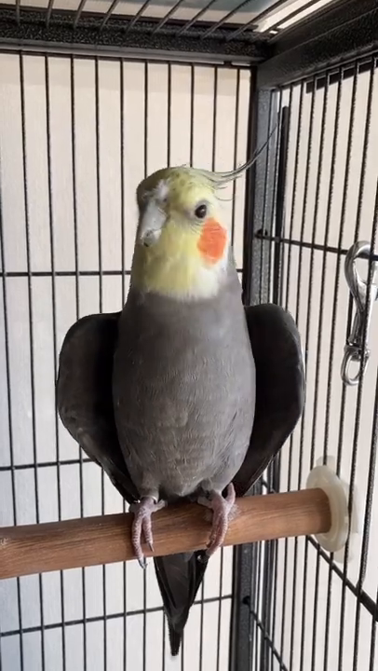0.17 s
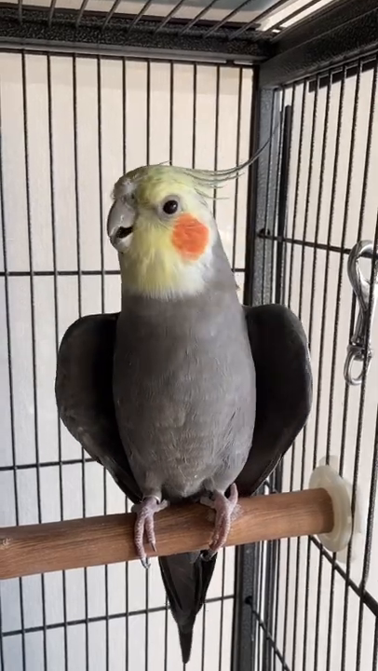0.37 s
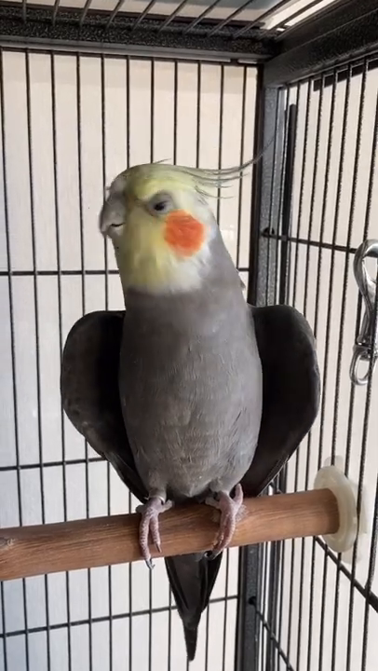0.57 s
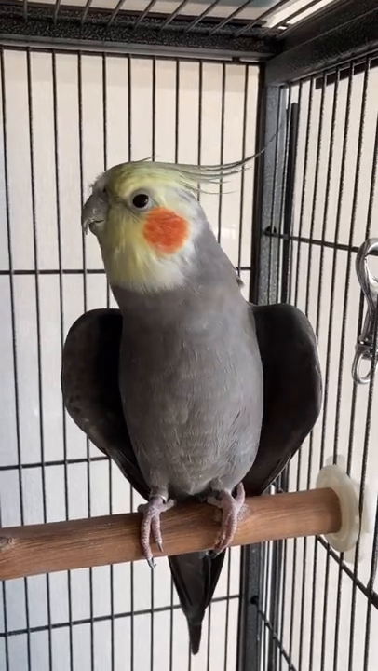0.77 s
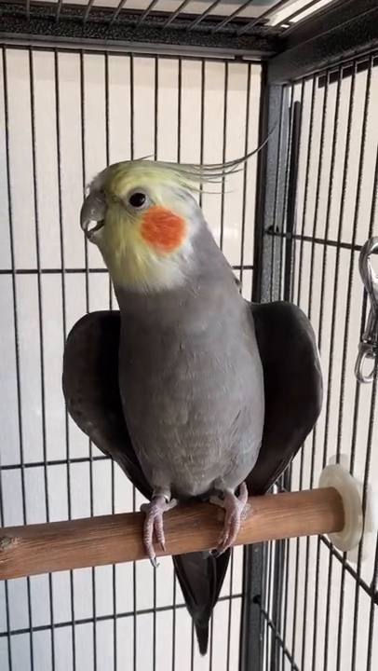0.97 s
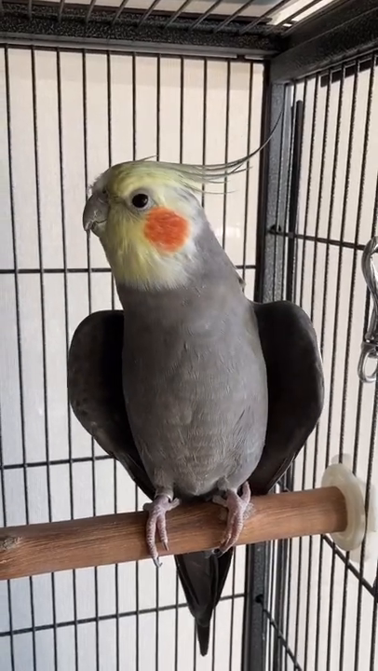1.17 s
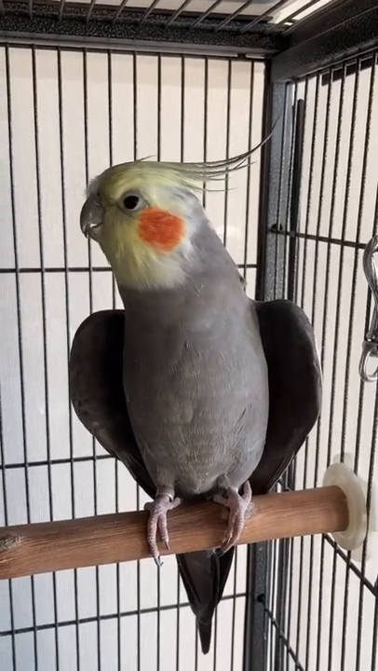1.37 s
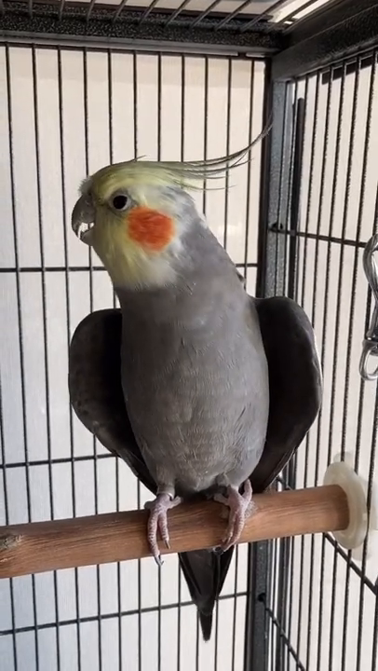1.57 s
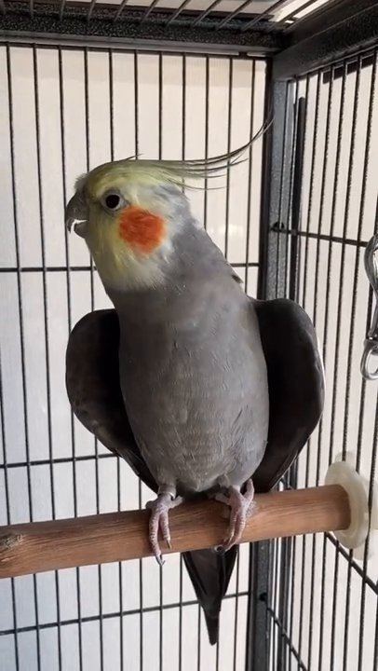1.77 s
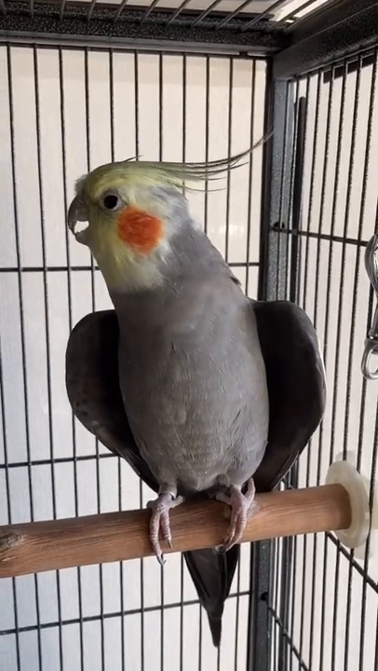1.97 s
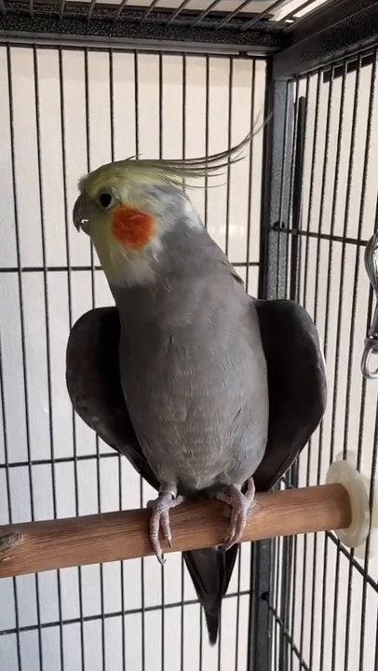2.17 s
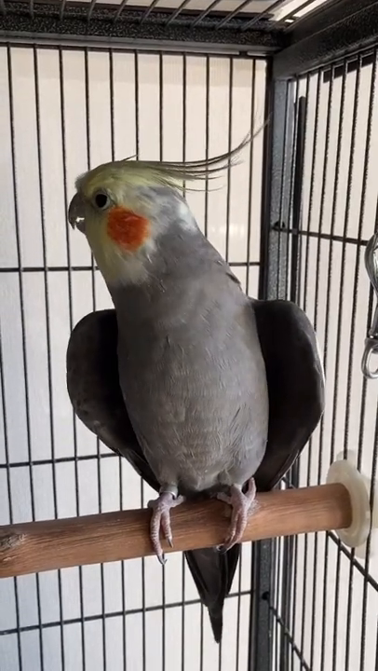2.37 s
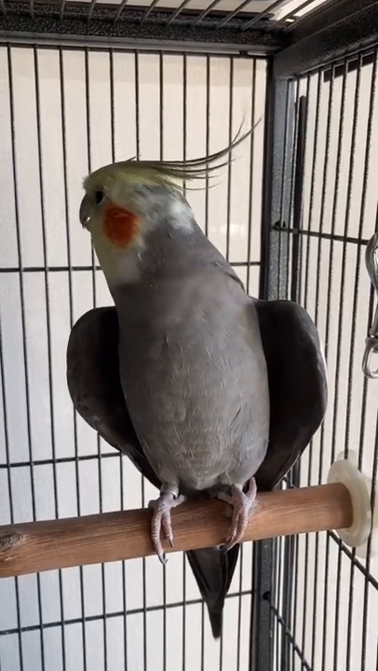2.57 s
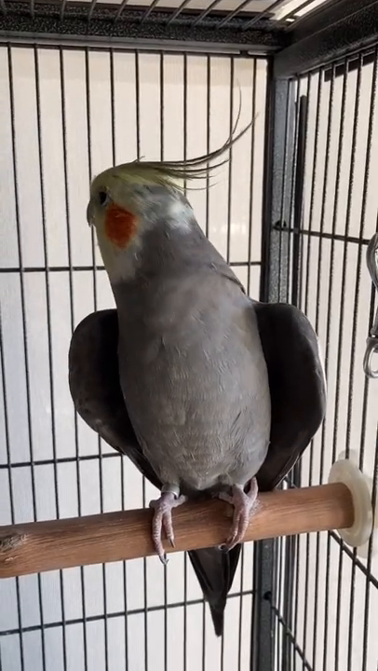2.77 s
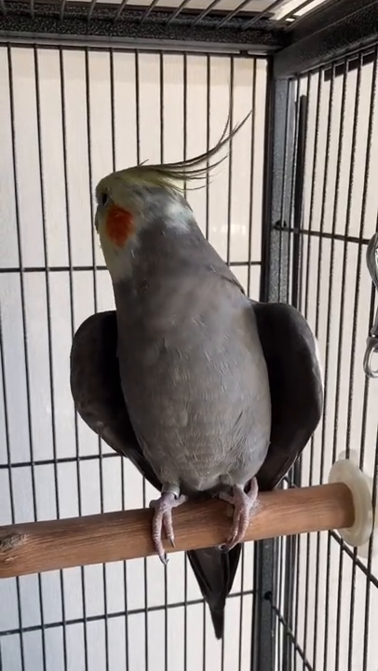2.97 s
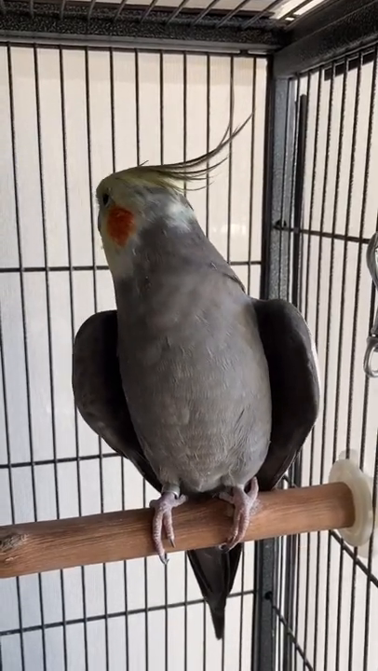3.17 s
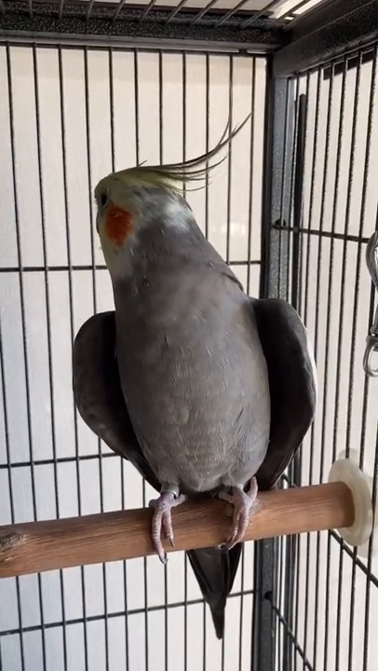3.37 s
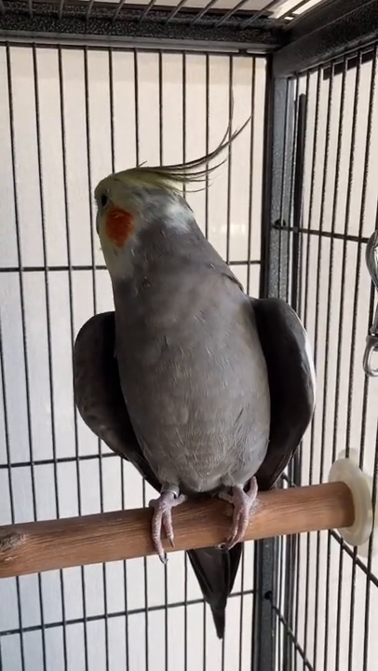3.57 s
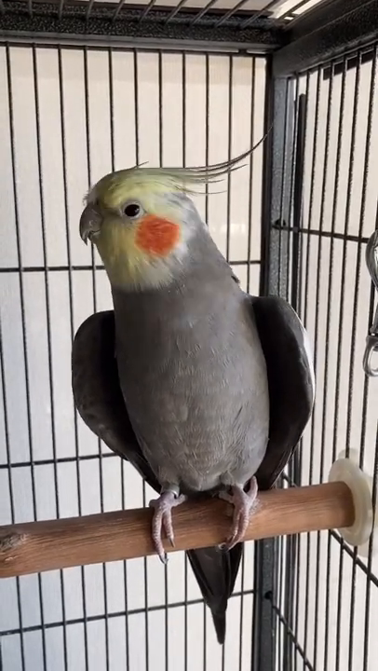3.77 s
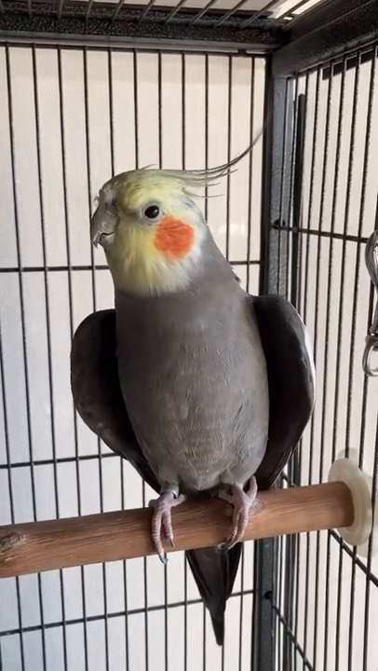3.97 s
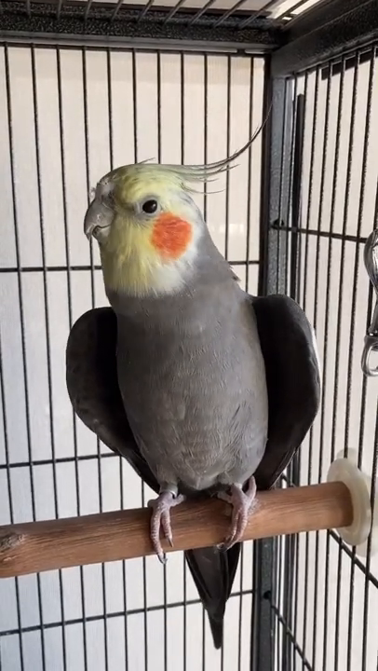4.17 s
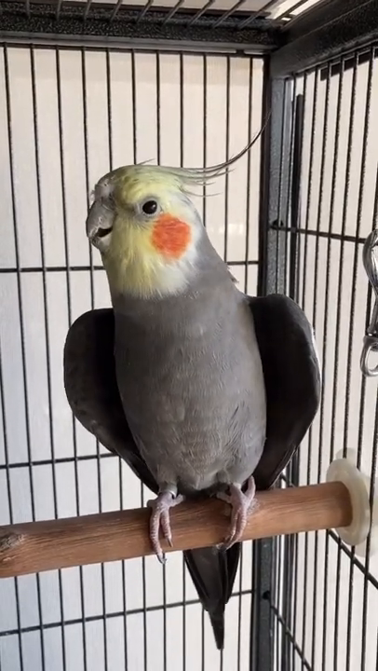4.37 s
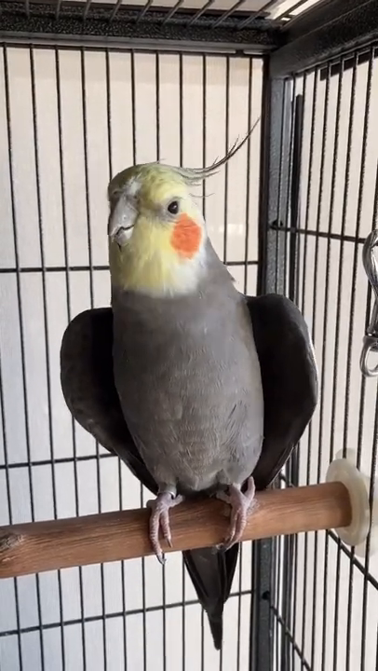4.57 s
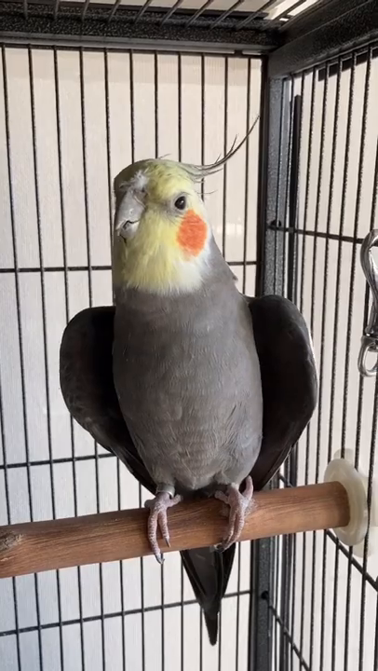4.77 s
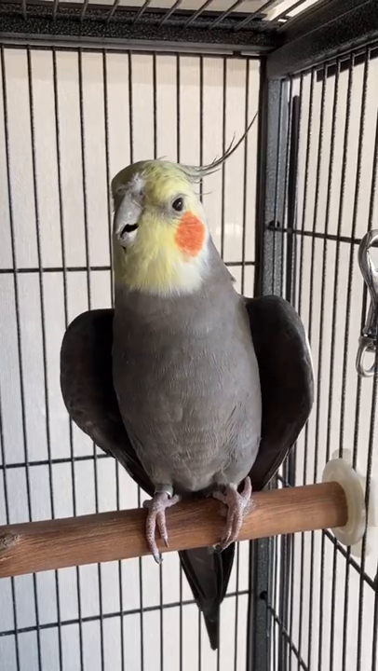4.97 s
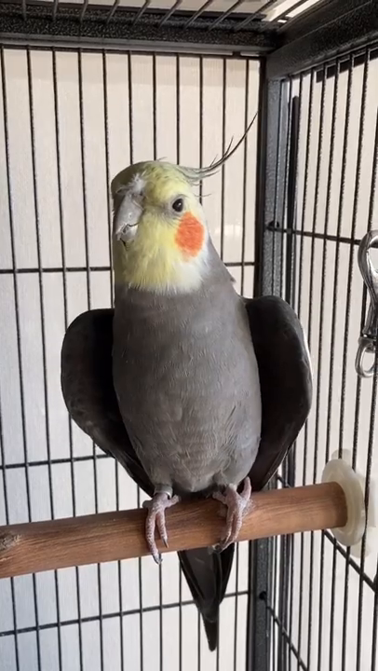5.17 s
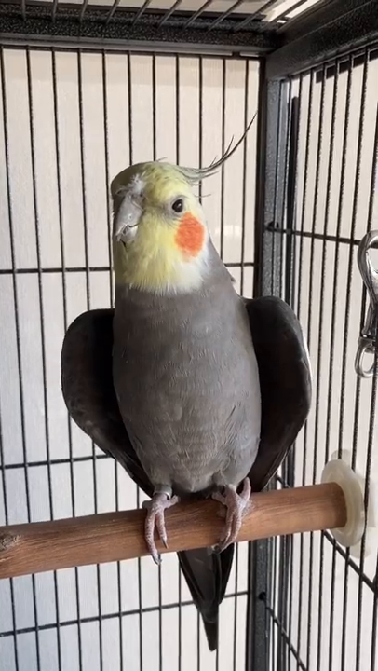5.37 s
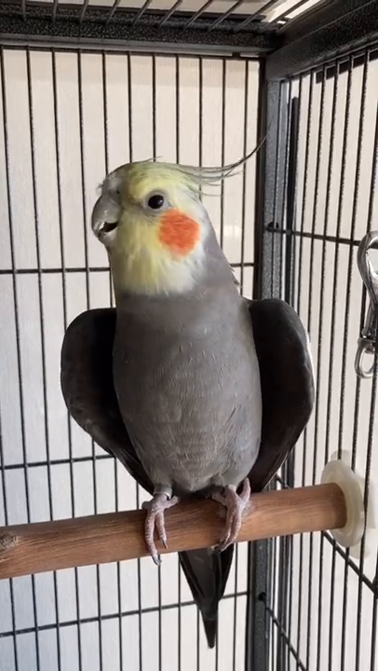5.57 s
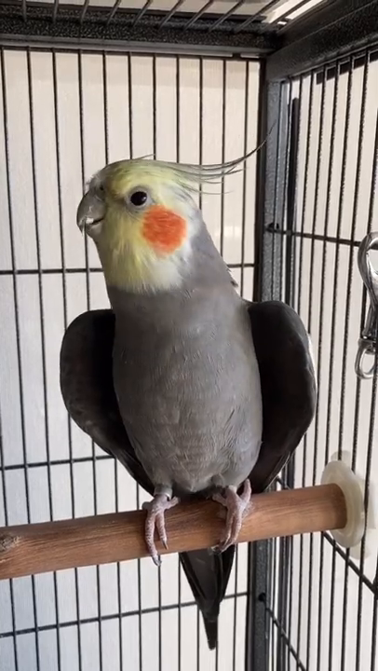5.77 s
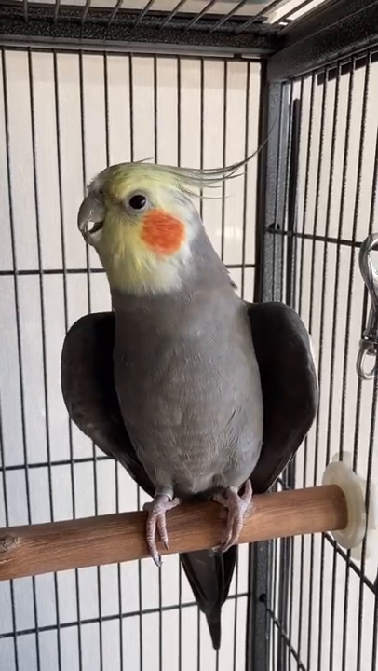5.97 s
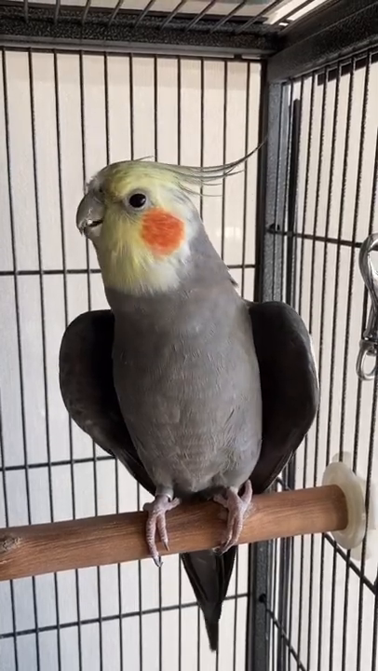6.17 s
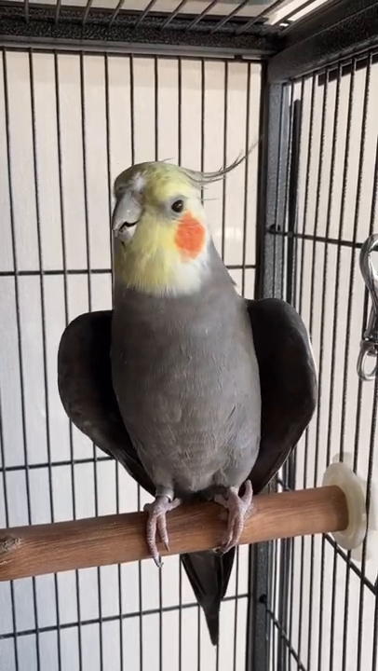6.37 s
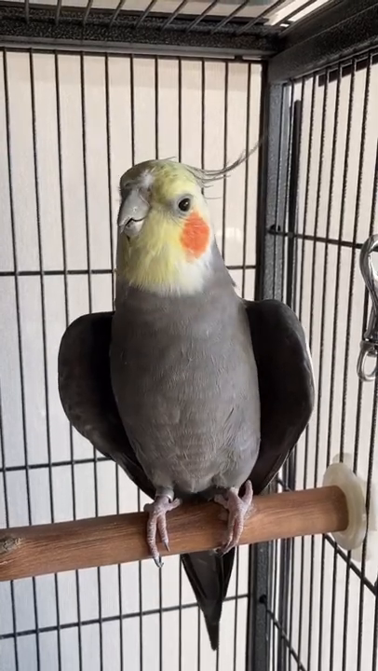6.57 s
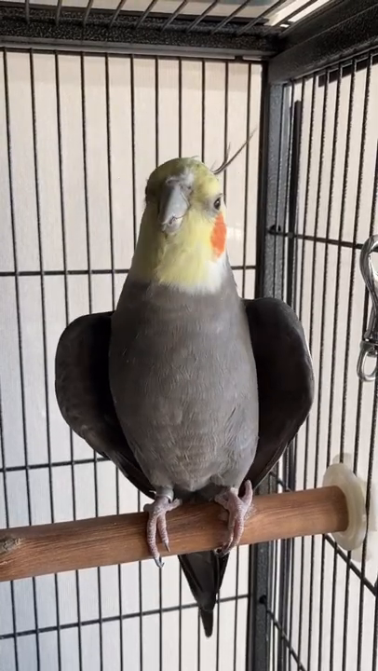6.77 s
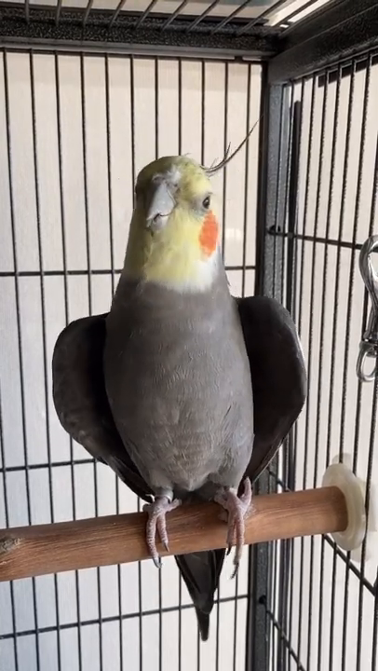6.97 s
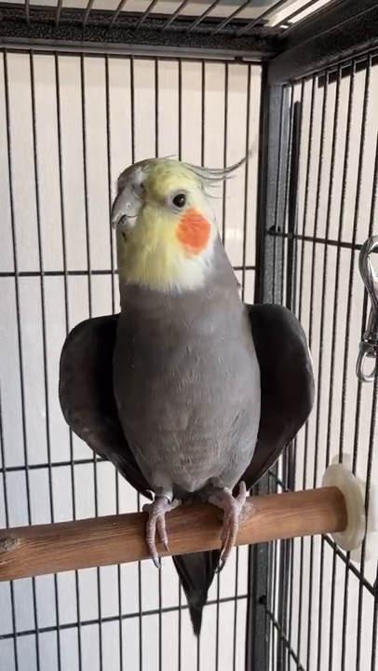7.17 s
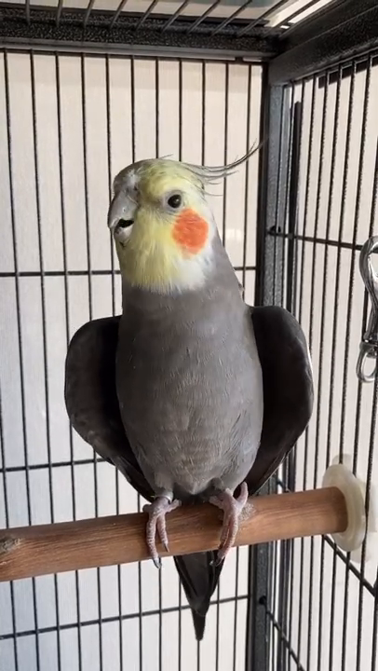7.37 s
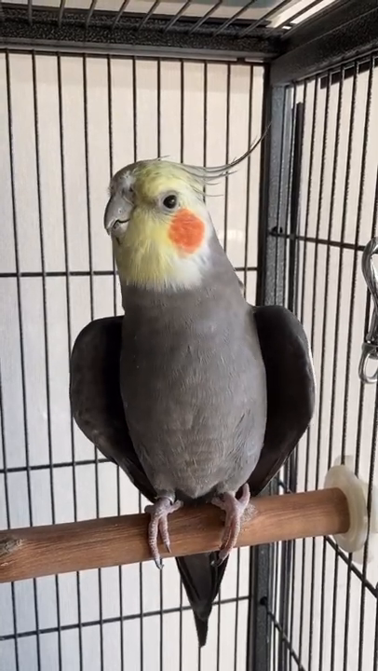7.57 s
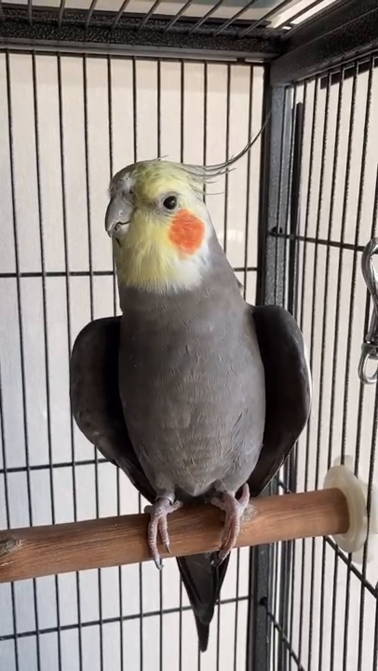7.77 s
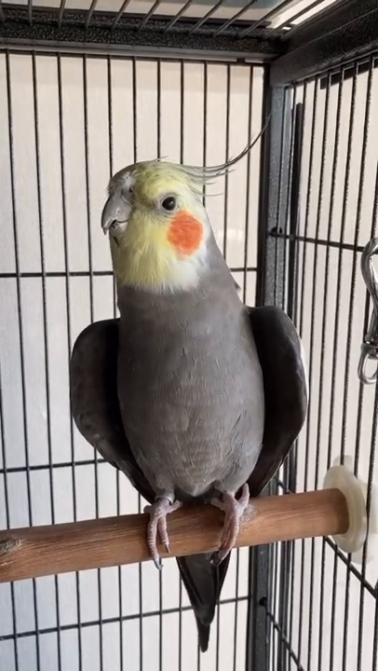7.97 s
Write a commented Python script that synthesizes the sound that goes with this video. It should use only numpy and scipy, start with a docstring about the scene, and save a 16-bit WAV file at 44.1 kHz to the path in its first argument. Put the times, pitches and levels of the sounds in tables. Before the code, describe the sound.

A cockatiel sings close to the microphone in a quiet room. From the start it whistles short, high notes that glide up and down, many opening with a brief rasp. Between about 0.6 and 1.4 seconds a second bird answers with a few longer, harsher calls. The cockatiel carries on in quick, sometimes rough runs until about 2.9 seconds, then pauses. A dry beak click at 4 seconds opens the second phrase, with scattered whistles until nearly 5 seconds and a faint feather rustle around 5.3. Rapid notes return at 5.5 seconds, and the second bird calls twice more between 5.9 and 6.4. Light beak clicks fall near 6.5 and 7 seconds among rising whistles, and a last run climbs and drops away at about 8 seconds. Cage and walls add short echoes, with very faint room air and a low appliance hum throughout.

```python
"""Two birds in a quiet room

A cockatiel whistles short gliding notes with the membrane of its voice organ, near a two-port
microphone. A second bird answers with brighter, harsher calls; each note starts with a short rasp.
Beaks click and feathers rustle. Cage and walls throw the notes back; an appliance hums far below."""
import sys
import numpy as np
from scipy import signal
from scipy.fft import rfft, irfft, next_fast_len
from scipy.io import wavfile
from scipy.ndimage import uniform_filter1d

SR = 44100
rng = np.random.default_rng(int(sys.argv[2]) if len(sys.argv) > 2 else 0)


def persist_wave(psi):
    """Save psi, clipped to +-1, as 16-bit WAV."""
    counts = np.round(np.clip(psi, -1, 1) * 32767).astype(np.int16)
    wavfile.write(sys.argv[1], SR, np.atleast_2d(counts).T)


N = 354255


def from_db(db):
    """Turn decibels into a number to multiply by."""
    return 10 ** (np.asarray(db) / 20)


def rms_one(x):
    """Scale a signal to an average strength (rms) of 1."""
    return x / np.sqrt(np.mean(x ** 2) + 1e-20)


def at_hz(points, hz):
    """Read between the rows of a (frequency, value) table, on a log scale."""
    freqs, values = np.transpose(points)
    return np.interp(np.log(hz + 1), np.log(freqs), values)


def coloured(spectrum, count, channels=1):
    """Noise of strength 1, its lows and highs shaped by a table."""
    size = next_fast_len(count)
    hz = np.fft.rfftfreq(size, 1 / SR)
    white = rng.standard_normal((channels, size))
    return rms_one(irfft(rfft(white) * from_db(at_hz(spectrum, hz)), size)[:, :count])


def wobble(rate_hz, count):
    """A random wiggle of strength 1, up to about rate_hz fast."""
    sos = signal.butter(4, rate_hz, fs=SR, output="sos")
    return rms_one(signal.sosfilt(sos, rng.standard_normal(count + 2000))[2000:])


# How far the left side runs ahead of the right: f/Hz, phase/rad
LEFT_LEAD = [(300, 0.01), (1500, 1.99), (2400, 1.834), (4000, 1.63), (5400, 2.77), (8500, 6.05),
             (11700, 9.4), (15000, 12.3)]

def ports(hz):
    """The microphone's two openings hear a near sound out of step."""
    return np.exp(.5j * at_hz(LEFT_LEAD, hz) * np.array([[1], [-1]]))


# Tone of the room's air: f/Hz, level/dB
AIR_COLOUR = [(30, -14.5), (50, -5.5), (90, -8), (200, 2), (330, -9.5), (480, -4), (700, -15), (1300, -8.5),
              (2000, -14), (3000, -26), (4000, -28), (10500, -28.5), (14000, -61.5)]
# How alike left and right are: f/Hz, likeness (1 = the same)
AIR_LIKENESS = [(60, 0.56), (290, 1), (640, 0.085), (3000, .1), (6000, 0.92)]

def room_air():
    """Steady air noise, alike on both sides in the bass and the treble."""
    hz = np.fft.rfftfreq(N, 1 / SR)
    mid, side = rfft(coloured(AIR_COLOUR, N, channels=2))
    alike = at_hz(AIR_LIKENESS, hz)
    both = np.sqrt(1 + alike) * mid + np.sqrt(1 - alike) * side * [[1], [-1]]
    return from_db(-67.5) * rms_one(irfft(both * ports(hz), N))


# The appliance's low tones: f/Hz, width/Hz, level/dB
HUM_TONES = [(61.34, 1.8, -72), (85.5, 9.1, -74), (137.5, 1.7, -72.5), (242.4, 7.3, -68.5)]

def appliance_hum():
    """One steady tone plus wavering ones, made by noise ringing in narrow resonances."""
    out = from_db(-68) * np.sqrt(2) * np.sin(2 * np.pi * HUM_TONES[0][0] * np.arange(N) / SR)
    for hz, width, db in HUM_TONES:
        decay = np.exp(-np.pi * width / SR)
        feedback = [1, -2 * decay * np.cos(2 * np.pi * hz / SR), decay ** 2]
        ringing = signal.lfilter([1, 0, -1], feedback, rng.standard_normal(N + SR))
        out += from_db(db) * rms_one(ringing[SR:])
    return out * from_db([[-.6], [.6]])   # a little louder on the right


def room(x, near_fade_s, far_db, wall_hz, bass_hz, near_db=-1.5, far_fade_s=.44):
    """Add quick echoes and a dull tail from cage and walls; each drops 60 dB in its fade time."""
    size = next_fast_len(N + SR)
    t, hz = np.arange(SR // 2) / SR, np.fft.rfftfreq(size, 1 / SR)
    noise = rng.standard_normal((2, 3, len(t))) * (t > .001)
    near = noise[0] * from_db(-60 * t / near_fade_s)
    far = noise[1] * from_db(-60 * t / far_fade_s)
    near, far = [rfft(e / np.sqrt(np.sum(e[0] ** 2)), size) for e in (near, far)]
    echoes = from_db(near_db) * near / (1 + .5j * hz / wall_hz)
    echoes += from_db(far_db) * far / (1 + 1j * hz / wall_hz)
    bass = 1 / (1 + (hz / bass_hz) ** 4)   # long waves reach each port by their own paths
    paths = (1 + np.sqrt(1 - bass) * echoes[0]) * ports(hz) + np.sqrt(bass) * echoes[1:]
    return irfft(rfft(x, size) * paths, size)[:, :N]


# Feather movements: middle t/s, half width/s, level/dB
FEATHER_SWELLS = [(5.03, 0.032, -80), (5.21, 0.028, -76), (5.245, 0.0128, -70), (5.302, 0.0096, -58.5),
                  (5.47, 0.033, -71)]
# Tone of their hiss: f/Hz, level/dB
FEATHER_COLOUR = [(2000, -20.5), (4500, -6.5), (7000, -4.5), (10500, -1), (13000, -8.5), (16000, -12)]

def feathers():
    """Feathers rustle: a bright hiss swells and fades."""
    t = np.arange(N) / SR
    level = sum(from_db(db) * np.exp(-.5 * ((t - s) / width) ** 2) for s, width, db in FEATHER_SWELLS)
    return level * from_db(1.52 * wobble(120, N)) * coloured(FEATHER_COLOUR, N)[0]


# Beak clicks: t/s, relative level/dB
CLICKS = [(3.3691, -61.5), (3.5999, -63.5), (4.027, -33), (4.588, -54.5), (6.552, -38), (7.0447, -47)]

def beak():
    """Each click is a dry, bright crack of noise that dies away fast."""
    out, t = np.zeros(N), np.arange(1500) / SR
    highs = signal.butter(2, 3500, "high", fs=SR, output="sos")
    for s, db in CLICKS:
        noise, at = signal.sosfilt(highs, rng.standard_normal(len(t))), round(s * SR)
        out[at:at + len(t)] += noise * from_db(db - 7 - 60 * t / .084)
    return out


def rasp_bursts(notes, burst_s=.038, scratch_from_hz=2200):
    """Strength of rasp and scratch: a short, fluttering burst starts each note, then lingers."""
    t, (rasp, scratch) = np.arange(N) / SR, np.zeros((2, N))
    for s, length, _, hz, *_, db in notes:
        end = s + max(length, burst_s + .012)
        times = [s - .008, s + .0085, s + .91 * burst_s, s + burst_s, end, end + .0073]
        rasp += from_db(db) * np.interp(t, times, [.0015, 1, .66, .1, .1, 0], left=0)
        high = np.clip((hz - scratch_from_hz) / 300, 0, 1)
        scratch += high * from_db(db - 6) * np.interp(t, times, [0, 1, 1, .7, .7, 0])
    flutter = from_db(4.2 * wobble(46, N) + 2.5 * wobble(240, N))
    return rasp * flutter, scratch * flutter


# Tone of the rasp: f/Hz, level/dB
RASP_TONE = [(250, -17), (600, -17), (1100, 0.5), (1800, 8), (2800, -13.5), (4000, -28.5), (16000, -23.5)]
# Tone of the bright scratch on high notes: f/Hz, level/dB
SCRATCH_TONE = [(3100, -40), (3550, -3), (3900, -18), (4400, 0), (4900, -4), (5400, -30), (6500, -28),
                (7100, -4), (8000, -14), (16000, -25)]

def rasping(voice, rasp, scratch, shake_db):
    """Rasping noise, plus a fast shake in loudness that roughens the note."""
    shake = np.minimum(rasp * from_db(shake_db), .7) * wobble(450, N)
    return rasp * coloured(RASP_TONE, N)[0] + scratch * coloured(SCRATCH_TONE, N)[0] + shake * voice


# Tone of the membrane's faint buzz: f/Hz, level/dB
BUZZ_COLOUR = [(5000, -5), (8500, -9), (10500, 13.5), (11800, 10.5), (13500, 11), (16000, 10)]

def high_partials(hz, phase, third_db, buzz_db, fall_db, rough_db):
    """Partial k is a tone at k times the pitch. Numbers 3 to 12 fall away to a faint buzz."""
    out, octaves = 0, np.log2(hz / 2000)
    buzz = from_db(buzz_db - np.maximum(16 * octaves, -36 * octaves))   # strongest at mid pitch
    for k in range(3, 13):
        throat = 1 / (1 + (k * hz / 11500) ** 4)   # the throat passes little of the very top
        level = from_db(third_db - fall_db * (k - 3.5)) * throat
        level += (k > 3) * buzz * from_db(at_hz(BUZZ_COLOUR, k * hz))
        level *= from_db(rough_db * wobble(350, len(hz)) + 4 * wobble(25, len(hz)))
        out += level * (k * hz < 17000) * np.sin(k * phase)
    return out


# Rough spells: start t/s, end t/s, level/dB above partial 2, extra level/dB of the lowest tone
DOUBLED_SPELLS = [(1.211, 1.38, -15.5, -27), (1.84, 2.005, -15, 2.5), (2.27, 2.305, -12, 23.5),
                  (2.3, 2.348, -15.5, 18), (2.505, 2.547, -16.5, 6), (2.793, 2.921, -8, 2),
                  (4.809, 4.838, -11, 4.5), (5.828, 5.922, -13, -1), (5.92, 6.121, -37, -9.5),
                  (6.25, 6.447, -13.5, -35), (7.244, 7.273, -16, 10), (7.68, 7.738, -23, 4),
                  (7.845, 7.948, -8.5, 7)]

def period_doubling(t, phase, second_db, rough_db):
    """The vibration repeats only every second swing, adding tones halfway between the partials."""
    out = np.zeros(len(t))
    for start, end, db, lowest_db in DOUBLED_SPELLS:
        fade = np.clip(np.minimum(t - start, end - t) / .0093, 0, 1)
        if fade.any():
            gains = from_db([lowest_db, 0, -1.3, -2.6, -3.9])
            halves = sum(gain * np.sin((k + .5) * phase) for k, gain in enumerate(gains))
            out += fade * from_db(second_db + db + rough_db * wobble(100, len(t))) * halves
    return out


def shaky_pitch(t, hz, pressed, jitter, rasp, trill_hz=105):
    """The pitch drifts slowly; it also shakes quickly when the voice is pressed or rasping."""
    unsteady = jitter * pressed + np.minimum(rasp * from_db(14), .03)
    hz = hz * (1 + unsteady * wobble(170, len(t)) + .003 * wobble(27, len(t)))
    trill = np.sin(2 * np.pi * trill_hz * t + 1.5 * wobble(30, len(t)))
    return hz * (1 + .011 * pressed ** 2 * trill)


# Tone of the air leaking through the voice organ: f/Hz, level/dB
LEAK_COLOUR = [(500, -27), (1200, -18.5), (2500, -10.5), (4000, 8), (7000, 7), (11000, -1), (16000, -12.5)]

def bird(contours, rasp, fall_db, buzz_db, rough_db, breath_db, jitter, hoarse, edge_s=.004):
    """A vibrating membrane sings along rows of t/s, f/Hz and level/dB of partials 1, 2 and 3."""
    out, air = np.zeros(N), coloured(LEAK_COLOUR, N)[0]
    for rows in contours:
        times, *columns = np.transpose(rows)
        at = np.arange(max(int((times[0] - edge_s) * SR), 0), min(int((times[-1] + edge_s) * SR), N))
        t, count = at / SR, len(at)
        hz, first_db, second_db, third_db = [
            uniform_filter1d(np.interp(t, times, c), size=301, mode="nearest") for c in columns]
        glide = uniform_filter1d(np.abs(np.gradient(np.log(hz))) * SR, size=600)
        pressed = np.clip(1 + (second_db - first_db) / 26, .15, 1)   # brighter means more pressed
        lively = np.clip(glide / 3, .45, 2.4)   # a held note settles, a fast glide frays
        hz = shaky_pitch(t, hz, pressed, jitter * lively, rasp[at])
        phase = 2 * np.pi * np.cumsum(hz) / SR
        # the tone's loudness flutters unevenly, more on fast glides
        flutter_db = 2.8 * np.clip(lively, .7, 1) * wobble(70, count)
        first = from_db(first_db + flutter_db) * np.sin(phase)
        upper = from_db(second_db + rough_db * wobble(170, count) + 3 * wobble(25, count))
        upper *= np.sin(2 * phase)
        upper += high_partials(hz, phase, third_db, first_db + buzz_db, fall_db, rough_db)
        upper += period_doubling(t, phase, second_db, rough_db)
        upper *= 1 + hoarse * np.clip(glide / 3, .3, 5) * wobble(1200, count)   # a fast, blurring shake
        loudness = from_db(first_db - 19) + from_db(second_db) + from_db(third_db)
        leak = loudness * from_db(breath_db) * (.4 + .3 * glide) * air[at]   # fast glides leak more air
        fade = np.clip(np.minimum(t - times[0], times[-1] - t) / edge_s + 1, 0, 1) ** 2
        out[at] += (np.sqrt(2) * (first + upper) + leak) * fade
    return out


# The second bird's calls: t/s, length/s, f/Hz early and late, scoop and drop as shares of the pitch,
# level/dB early and late for each of partials 1, 2 and 3, rasp level/dB
CALLS = [(0.602, .16, 1478, 1450, 0.018, -0.38, -49.5, -57, -59, -68, -69.5, -66.5, -63),
         (0.831, 0.1373, 2513, 2520, 0.18, 0.16, -23, -24, -27.5, -33.5, -30.5, -38, -45),
         (0.978, 0.076, 2153, 1990, 0.23, 0.011, -27, -32, -36, -33, -27.5, -29.5, -60.5),
         (1.153, 0.21, 2281, 2310, 0.3, 0.094, -25, -20.5, -30, -20.5, -30, -28, -48),
         (5.906, .2, 2429, 2600, 0.064, .18, -19.5, -25.5, -26, -24.5, -36, -30, -55),
         (6.224, 0.22, 2379, 2294, 0.23, 0.1, -21.5, -23.5, -27.5, -23.5, -31.5, -34, -50.5)]

def answer_contours():
    """Each call scoops up to a held, slightly arched pitch, then bends away; both ends are softer."""
    out, u = [], np.arange(41) / 40   # u runs from 0 to 1 through the call
    for s, length, early_hz, late_hz, scoop, drop, *db, _ in CALLS:
        head, tail = np.exp(-(u / .14) ** 1.4), np.exp(-(length * (1 - u) / .024) ** 2)
        held_hz = (early_hz + (late_hz - early_hz) * u) * (1 + .032 * u * (1 - u))
        hz = held_hz * (1 - scoop * head) * (1 - drop * tail)
        loss_db = (21.5 * head + 7 * tail) * np.array([[1], [.63], [.63]])
        early_db, late_db = np.reshape(db, (3, 2, 1)).swapaxes(0, 1)
        levels_db = early_db + (late_db - early_db) * u - loss_db
        out.append(list(zip(s + length * u, hz, *levels_db)))
    return out


def arc(u, start, middle, end):
    """A smooth bend through three values as u goes from 0 to 1."""
    return start * (1 - u) * (1 - 2 * u) + 4 * middle * u * (1 - u) + end * u * (2 * u - 1)


# The cockatiel's notes: t/s, length/s, f/Hz at start, middle and end, level/dB at the same three points,
# level/dB of partial 2 above 1 at start and end, level/dB of partial 3 above 2, rasp level/dB
WHISTLES = [ (0, 0.11, 1456, 1474, 1520, -34.5, -30, -38, -29.5, -15.5, -19, -63),
            (0.124, 0.013, 1414, 1407, 1256, -21, -35.5, -18, -30.5, -39, -16, -71.5),
            (0.187, 0.025, 1653, 1824, 1842, -45, -25.5, -31, -32, -31, 0.5, -37.5),
            (0.221, 0.032, 1950, 1874, 1851, -28.5, -28, -17.5, -29.5, -34.5, 2.5, -57.5),
            (0.263, 0.026, 1791, 2048, 2330, -34.5, -24.5, -27, -39, -28.5, 2.5, -40.5),
            (.3, 0.071, 2262, 2623, 2790, -16.5, -14, -37.5, -34.5, -29.5, -5, -72.5),
            (0.525, 0.043, 1707, 1755, 1744, -46, -35, -43.5, -15, -44, -3, -45),
            (0.757, 0.096, 1764, 1859, 1690, -41, -18, -30, -31.5, -28.5, -10, -45),
            (0.868, 0.032, 1706, 1930, 2483, -43.5, -21.5, -22.5, -25, -25, -15.5, -54),
            (0.902, 0.064, 2245, 2672, 2810, -21, -17.5, -30, -34.5, -17, -8, -52.5),
            (1.596, 0.0563, 1514, 1826, 2059, -52.5, -23.5, -19, 15.5, -10.5, -7, -49),
            (1.65, 0.052, 2076, 2114, 2170, -16, -20, -25.5, -10.5, -2.5, -12.5, -67),
            (1.695, 0.058, 2425, 2600, 2288, -10, -22, -14, -17, -28, -12, -66.5),
            (1.755, 0.013, 2370, 2074, 2000, -20, -27.5, -28.5, -43, -33, -12, -40.5),
            (1.812, 0.021, 3150, 3170, 3160, -40, -29.5, -35, -16.5, -28, -10, -61),
            (1.834, 0.039, 2864, 2763, 2800, -16, -16.5, -26, -18, -28, -8.5, -48),
            (1.879, 0.017, 3357, 3140, 3060, -23.5, -26, -24, -24, -18, -25.5, -52.5),
            (1.895, 0.066, 2940, 2864, 2890, -23, -18, -6, -12.5, -27, -8, -62),
            (1.949, 0.058, 3013, 3168, 3124, -24, -17.5, -39.5, -28.5, -13.5, -8, -52.5),
            (2.17, 0.063, 2547, 2596, 2500, -32.5, -18.5, -16.5, -20, -23.5, -26, -47.5),
            (2.231, 0.043, 2566, 2564, 2655, -28, -21, -21, -23, -40.5, 2, -55),
            (2.267, 0.038, 2890, 2850, 2790, -22.5, -25, -21.5, -22, -30, -17, -55),
            (2.302, 0.028, 2725, 2452, 2464, -23, -16.5, -25, -28.5, -51, 1, -51),
            (2.49, 0.054, 2088, 2318, 2420, -32.5, -15.5, -7.5, -18, -38.5, -16.5, -50.5),
            (2.552, 0.035, 2426, 2574, 2756, -26.5, -24, -22, -33.5, -22.5, -1, -64.5),
            (2.588, 0.022, 2784, 2755, 2680, -27.5, -23, -29.5, -24, -49.5, -8, -64.5),
            (2.656, 0.015, 2420, 2332, 2290, -31.5, -30, -35.5, -37, -45, -26, -52),
            (2.681, 0.061, 1513, 1671, 1930, -41.5, -27.5, -23.5, -6.5, -27, -11, -58.5),
            (2.754, 0.0753, 2082, 2124, 1922, -20.5, -18.5, -32, -33, -23.5, -7, -60),
            (2.831, 0.066, 1907, 1927, 1784, -37, -33, -33, -14, -25.5, -12.5, -65),
            (2.899, 0.024, 1795, 1732, 1540, -8, -35, -35, -37.5, -17, -41.5, -43),
            (4.046, 0.045, 1783, 1975, 2063, -30.5, -22, -17, 5, -17, -11, -50.5),
            (4.1, 0.055, 2070, 2030, 1983, -19, -18.5, -21, -9.5, -17, -15, -70.5),
            (4.147, 0.0406, 2007, 2105, 2016, -18, -21, -28.5, -26.5, -38, -12, -57),
            (4.225, 0.0456, 2320, 2547, 2656, -34.5, -19.5, -27.5, -13.5, -33, -37, -47.5),
            (4.265, 0.043, 2677, 2816, 3006, -23, -18.5, -25.5, -28.5, -14, -6.5, -49),
            (4.491, 0.032, 1908, 2042, 2040, -41.5, -25.5, -30, -27, -23.5, -6.5, -39),
            (4.721, 0.061, 1763, 1834, 1903, -40.5, -21, -26.5, -29, -46, 1.5, -45),
            (4.79, 0.05, 1880, 1803, 1730, -16.5, -26.5, -28, -42, -19.5, -4.5, -66),
            (4.839, 0.028, 1789, 2012, 2410, -22, -22.5, -16, -49, -9.5, -17.5, -58.5),
            (4.869, 0.047, 2323, 2581, 2760, -16, -20.5, -18.5, -34, -25.5, -6, -45),
            (5.519, 0.042, 1673, 1776, 1983, -51.5, -25, -27.5, 11.5, -3.5, -12.5, -46),
            (5.564, 0.0702, 2036, 2152, 2380, -21, -20, -19, 2, -7.5, -15, -67),
            (5.642, 0.043, 2697, 2709, 2360, -14, -19.5, -7, -26, -30, -4, -57),
            (5.685, 0.05, 2455, 1750, 1402, -16, -34.5, -50.5, -24, -34, -22, -39),
            (5.748, 0.0189, 3051, 3367, 3250, -51.5, -36, -36, -26, -24, 4, -64),
            (5.774, 0.037, 2810, 2635, 2747, -23, -18, -21.5, -15.5, -46, -0.5, -41),
            (5.819, 0.0544, 3322, 2870, 2790, -26, -19.5, -22, -27.5, -15.5, -3.5, -52),
            (5.881, 0.053, 2820, 3082, 3043, -25, -16, -20.5, -15.5, -31.5, -4.5, -51),
            (6.132, 0.041, 2535, 2572, 2744, -23, -25.5, -12, -23.5, -30, -5, -43.5),
            (6.183, 0.065, 2736, 2912, 2970, -15, -28.5, -49.5, -18.5, 6.5, -13, -54),
            (6.421, 0.061, 2636, 2528, 2483, -33.5, -20, -10.5, -20.5, -31.5, -9.5, -43),
            (6.5, 0.0374, 2993, 3217, 2990, -29.5, -47.5, -40.5, -34, -34, -5.5, -54),
            (6.547, 0.036, 2497, 2360, 2370, -29, -22, -36.5, -21, -27, -15, -42),
            (6.75, 0.12, 1842, 1969, 2133, -32, -26.5, -18, -30, -28.5, -4, -50),
            (6.872, 0.066, 2350, 2364, 2341, -21.5, -10.5, -21.5, -21, -31, -28, -69.5),
            (6.94, 0.026, 2212, 1743, 1417, -24, -30.5, -70, -26, -26, -8, -53),
            (6.969, 0.06, 1405, 1317, 1560, -38.5, -50.5, -46, -29, -24.5, -24, -53.5),
            (7.135, 0.082, 1851, 1977, 2144, -33, -24.5, -19, -32, -34.5, -1, -53.5),
            (7.218, 0.048, 2155, 2272, 2467, -25, -19, -12.5, -23, -27.5, -14, -76),
            (7.266, 0.071, 2420, 2647, 2745, -16, -23.5, -26.5, -33, -29, -15, -47),
            (7.555, 0.079, 1100, 1102, 1124, -44, -42.5, -50.5, -15, -14.5, -23, -70.5),
            (7.644, .12, 1396, 1447, 1505, -39, -29.5, -25.5, -22.5, -14.5, -5.5, -52),
            (7.766, 0.095, 1560, 2238, 2038, -25.5, -21.5, -19.5, -19, -26, -8, -77),
            (7.86, 0.054, 2095, 1887, 1801, -20, -21, -16.5, -22, -34, -47, -58.5),
            (7.92, 0.042, 1768, 1617, 1338, -28.5, -35.5, -33.5, -24.5, -28, -31, -42.5), ]

def whistle_contours(slur_s=.012):
    """Each note bends in pitch and level; notes closer than slur_s run into each other."""
    out, u, last_end = [], np.arange(13) / 12, -1
    for s, length, *hz, start_db, middle_db, end_db, early_db, late_db, third_db, _ in WHISTLES:
        first_db = arc(u, start_db, middle_db, end_db)
        second_db = first_db + early_db + (late_db - early_db) * u
        rows = list(zip(s + length * u, arc(u, *hz), first_db, second_db, second_db + third_db))
        if s - last_end < slur_s:
            rows = [row for row in out.pop() if row[0] < s] + rows
        out.append(rows)
        last_end = s + length
    return out


def scene():
    """Both birds and their echoes, over the room's air and hum."""
    rasp, scratch = rasp_bursts(WHISTLES)
    answer_rasp, answer_scratch = rasp_bursts(CALLS)
    singer = bird(whistle_contours(), rasp, fall_db=2, buzz_db=-43.5, rough_db=1.5,
                  breath_db=-36, jitter=.007, hoarse=.02)
    answer = bird(answer_contours(), answer_rasp, fall_db=7, buzz_db=-45.5, rough_db=3.6,
                  breath_db=-31, jitter=.006, hoarse=.09)
    singer += rasping(singer, rasp, scratch, shake_db=24) + beak() + feathers()
    answer += rasping(answer, answer_rasp, answer_scratch, shake_db=36.5)
    birds = room(singer, near_fade_s=.09, far_db=-21.5, wall_hz=3840, bass_hz=3900)
    birds += room(answer, near_fade_s=.12, far_db=-14.5, wall_hz=3007, bass_hz=4130)
    return from_db(-2.5) * birds + room_air() + appliance_hum()


def record(dry):
    """Cut away the highest treble, above 15900 Hz."""
    return signal.sosfilt(signal.ellip(10, .5, 75, 15900, fs=SR, output="sos"), dry)


dry = scene()
out = record(dry)
persist_wave(out)
```